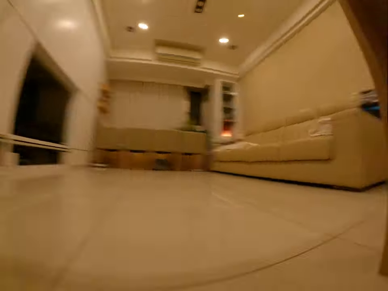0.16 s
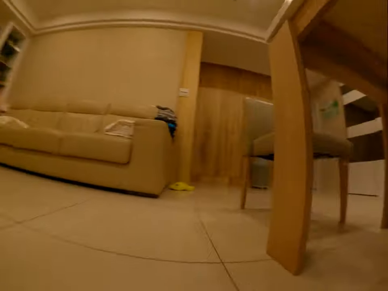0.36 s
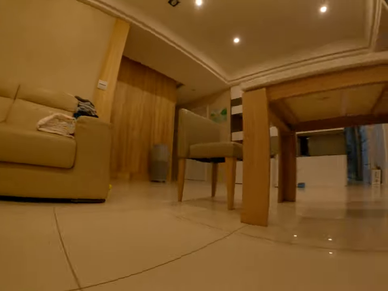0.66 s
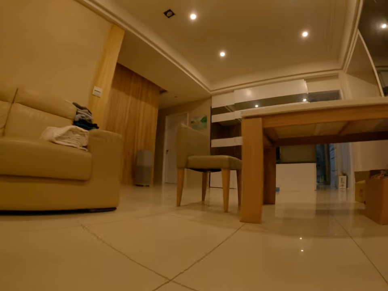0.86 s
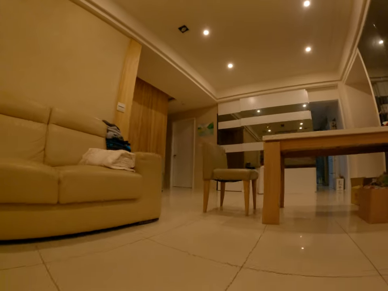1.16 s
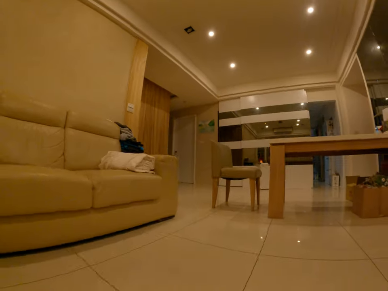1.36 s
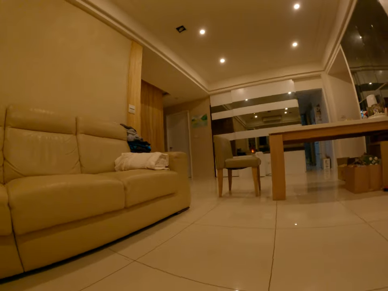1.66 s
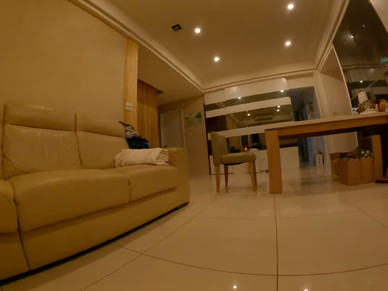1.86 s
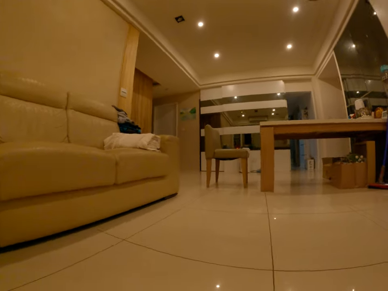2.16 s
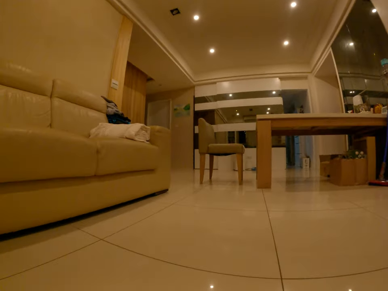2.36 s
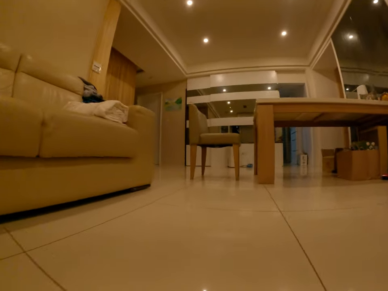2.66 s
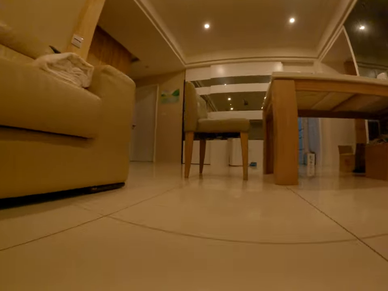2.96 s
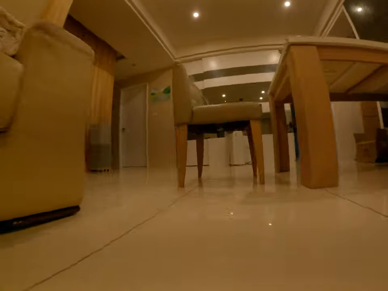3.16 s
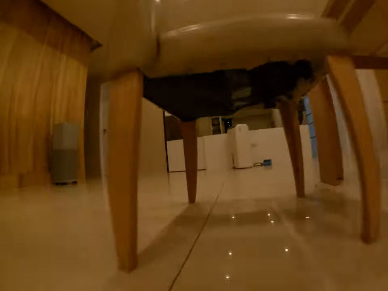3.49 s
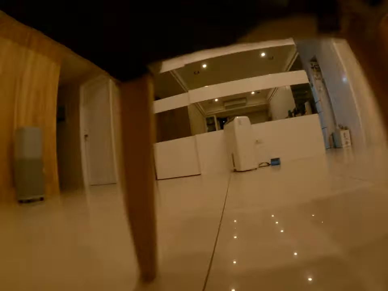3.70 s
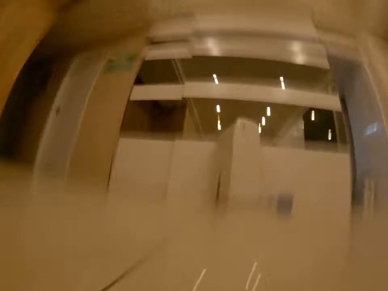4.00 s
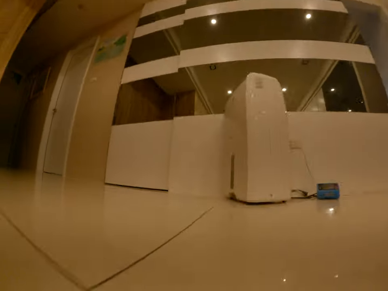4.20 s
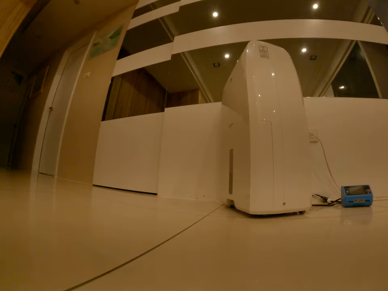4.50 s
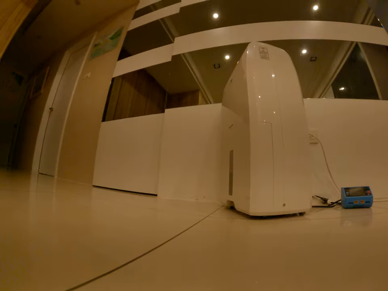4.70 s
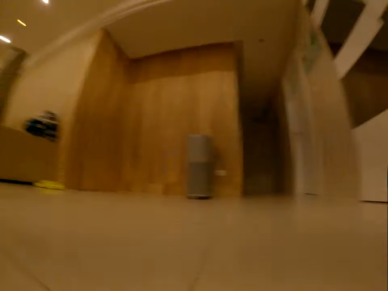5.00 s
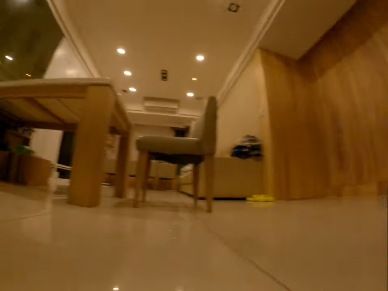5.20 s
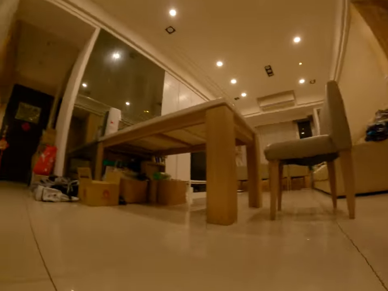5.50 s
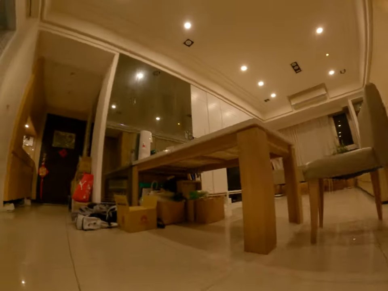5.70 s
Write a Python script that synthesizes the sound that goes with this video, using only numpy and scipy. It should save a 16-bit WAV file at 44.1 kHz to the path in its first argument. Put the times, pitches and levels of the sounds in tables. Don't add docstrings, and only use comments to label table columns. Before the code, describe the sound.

A small indoor drone whines and hisses, clatters down on tile, falls nearly silent, then its motors chirp and buzz back into flight.

```python
import sys
import numpy as np
from scipy import signal
from scipy.fft import rfft, irfft
from scipy.io import wavfile
from scipy.ndimage import uniform_filter1d

SR = 44100
rng = np.random.default_rng(int(sys.argv[2]) if len(sys.argv) > 2 else 0)


def wav_record(signal):
    frames = np.transpose(np.atleast_2d(signal))
    bounded = np.clip(frames, -1, 1)
    quanta = np.round(bounded * 32767).astype(np.int16)
    wavfile.write(sys.argv[1], SR, quanta)


def decibels_to_gain(level_db):
    exponent = np.asarray(level_db, float) / 20
    return 10 ** exponent


N = 257966
HOVER_HZ = 300
CHIP_HZ = 7600


def read(points, hz):
    f, value = np.transpose(points)
    return np.interp(np.log(hz + 1), np.log(f + 1), value)


def evened(x):
    return x / np.sqrt(np.mean(x ** 2) + 1e-20)


def play(rows, t):
    s, *columns = np.transpose(rows)
    return [np.interp(t, s, c) for c in columns]


def times(rows):
    return np.arange(rows[0][0], rows[-1][0], 1 / SR)


def add(mix, s, sound):
    part = mix[round(s * SR):][:len(sound)]
    part += sound[:len(part)]


def drift(size, hz):
    step = 32
    low_pass = signal.butter(2, hz, fs=SR / step, output="sos")
    coarse = signal.sosfilt(low_pass, rng.standard_normal(size // step + 500))
    count = size // step + 2
    return np.interp(np.arange(size) / step, np.arange(count), evened(coarse[-count:]))


def band(x, lo_hz, hi_hz):
    return signal.sosfilt(signal.butter(4, [lo_hz, hi_hz], "band", fs=SR, output="sos"), x)


def resonate(x, hz, width_hz):
    turn = np.exp(2j * np.pi * hz * np.arange(len(x)) / SR)
    r = np.exp(-np.pi * width_hz / SR)
    return 2 * (turn * signal.lfilter([1 - r], [1, -r], x / turn)).real


def air(tone, lo_hz, hi_hz, size, patchy_db, extra=None):
    hop = size // 4
    hz, t = np.fft.rfftfreq(size, 1 / SR), np.arange(N // hop + 5) * hop / SR
    a, b, patches = rng.standard_normal((len(t), len(hz), 3)).T
    patches = uniform_filter1d(patches, size=9, axis=0)
    patches = evened(uniform_filter1d(patches, size=9, axis=1))
    z = (a + 1j * b) * decibels_to_gain(read(tone, hz)[:, None] + patchy_db * patches)
    reference = band(signal.istft(z, nperseg=size)[1], lo_hz, hi_hz)
    scale = np.sqrt(np.mean(reference ** 2))
    if extra is not None:
        z = z * decibels_to_gain(extra(t, hz[:, None]))
    return signal.istft(z, nperseg=size, noverlap=size - hop)[1][:N] / scale * np.sqrt(2)


# hz, density_db
ROOM_TONE = [(20, -9), (60, 7), (160, 0), (370, -17), (600, -11), (2000, -28), (2670, -25), (4500, -39),
             (4900, -57), (9000, -72)]
# pitch_hz, level_db
WHINE = [(2159, -69), (2589, -67), (2649, -73), (2896, -76), (3079, -83), (4430, -80)]


def room():
    t = np.arange(N) / SR
    whine = 0
    for hz, db in WHINE:
        whine = whine + decibels_to_gain(db + 1.5 * drift(N, 7.8)) * np.sqrt(2) * np.sin(2 * np.pi * hz * t)
    return decibels_to_gain(-49.5) * air(ROOM_TONE, 174, 9000, size=1024, patchy_db=-2.5) + whine


# start_s, buffeting_db
WASH = [(0, -36), (.13, -24.5), (.7, -29.5), (.8, -23), (.96, -38), (1.1, -39), (1.25, -45), (1.55, -35),
        (1.75, -39), (2.0, -32.5), (2.31, -35), (2.51, -27), (3.03, -30), (3.12, -19.5), (3.3, -24.5),
        (3.5, -25), (3.65, -25.5), (3.8, -23), (4.05, -22), (4.32, -22.5), (4.52, -44.5), (4.65, -44.5),
        (4.76, -49), (4.9, -19.5), (5.08, -32), (5.26, -36), (5.41, -13.5), (5.54, -36), (5.85, -34)]
# hz, density_db
WASH_TONE = [(15, -12.5), (30, 1), (70, -5.5), (110, -3.5), (160, -10), (240, -11), (340, -20),
             (600, -49.5)]


def wash():
    def upper(t, hz):
        flying_db = 0.89 * (-29.5 - play(WASH, t)[0])
        upper_db = np.where(landed(t), -3, flying_db)
        return upper_db / (1 + (110 / (hz + 1)) ** 6)

    gusts = decibels_to_gain(play(WASH, np.arange(N) / SR)[0] + 1.9 * drift(N, 18.0))
    return gusts * air(WASH_TONE, 35, 83, size=2048, patchy_db=2.0, extra=upper)


# start_s, length_s, level_db, top_hz
PUFFS = [(.4, 0.13, -17, 234), (0.677, 0.093, -22, 203.6), (1.331, 0.19, -25, 186.5),
         (1.523, 0.11, -34, 80), (3.408, 0.061, -15.5, 259.4), (3.45, 0.08, -28, 89.86),
         (3.577, 0.08, -22, 79), (4.041, 0.064, -12, 144), (4.892, 0.07, -14.5, 291),
         (5.348, 0.092, -19.5, 222.2)]


def puffs():
    mix = np.zeros(N)
    for s, length_s, db, top_hz in PUFFS:
        lump = band(rng.standard_normal(SR // 2), top_hz / 3, top_hz)[-round(length_s * SR):]
        add(mix, s, decibels_to_gain(db) * evened(lump) * np.hanning(len(lump)))
    return mix


def thud(db):
    t = np.arange(3000) / SR
    blow = band(rng.standard_normal(len(t)) * decibels_to_gain(-60 * t / 0.071), 44, 650)
    return decibels_to_gain(db) * blow / abs(blow).max()


# start_s, peak_db, pitch_hz, brightness_db, thud_db
KNOCKS = [(4.017, -15, 3630, -8, -31), (4.0230, -17, 1750, -14, -12.5), (4.0456, -5, 1910, -6, -14),
          (4.0520, -5.5, 1640, -7.5, -20), (4.087, -20, 3000, -12, -30), (4.1815, -13.5, 3970, -7, -30),
          (4.1990, -12, 2460, -7, -15), (4.2060, -13, 1380, -19, -13.5), (4.255, -20, 1660, -14, -32),
          (4.2610, -17.5, 1540, -12, -34), (4.311, -27, 1250, -14, -40), (4.3230, -23, 1760, -12, -31),
          (4.3400, -25.5, 1440, -12, -44), (4.3600, -31, 1290, -8, -45), (4.578, -41, 2920, -36, -43),
          (4.79, -40, 1910, -23, -28.5)]


def knocks():
    mix, t = np.zeros(N), np.arange(3000) / SR
    decay = decibels_to_gain(-60 * t / 0.0085) + decibels_to_gain(-10 - 60 * t / 0.11)
    for s, peak_db, hz, bright_db, thud_db in KNOCKS:
        burst = rng.standard_normal(len(t)) * decay * np.minimum(t * 1500, 1)
        bright = band(burst, 4000, 15800) + 0.9 * resonate(burst, CHIP_HZ, 1460)
        bright = bright + 1.3 * band(burst, 10500, 15500)
        rattle = band(burst, 1170, 4900) + decibels_to_gain(bright_db + 3) * bright + 2.0 * resonate(burst, hz, 520)
        add(mix, s, decibels_to_gain(peak_db) * rattle / abs(rattle).max() + thud(thud_db))
    return mix


# start_s, peak_db
BUMPS = [(3.432, -14), (3.951, -9), (3.997, -13.5), (4.069, -16), (4.226, -21), (4.243, -26), (4.266, -27),
         (4.28, -29), (4.295, -28), (5.385, -14)]


def bumps():
    mix = np.zeros(N)
    for s, peak_db in BUMPS:
        add(mix, s - .004, thud(peak_db))
    return mix


# start_s, level_db
SKID = [(3.979, -60), (4.04, -30), (4.075, -32), (4.1, -30), (4.16, -44), (4.178, -37), (4.19, -44),
        (4.22, -39), (4.25, -50), (4.33, -50), (4.4, -55), (4.5, -62), (4.6, -72)]


def skid():
    mix, t = np.zeros(N), times(SKID)
    grit = rng.standard_normal(len(t)) * decibels_to_gain(4.8 * drift(len(t), 120))
    scrape = band(grit, 3000, 15000) + 1.3 * resonate(grit, CHIP_HZ, 1500)
    scrape = scrape + 5.5 * band(grit, 10500, 15500)
    add(mix, t[0], decibels_to_gain(play(SKID, t)[0]) * evened(scrape))
    return mix


# start_s, pitch_hz, level_db
ROCKING = [(4.201, 74.5, -50), (4.23, 76.7, -18), (4.3, 63.1, -20.5), (4.4, 61.8, -25.5),
           (4.49, 46.1, -25.5), (4.52, 48, -51)]


def rocking():
    mix, t = np.zeros(N), times(ROCKING)
    hz, db = play(ROCKING, t)
    swing = 2 * np.pi * np.cumsum(hz * (1 + 0.13 * drift(len(t), 29))) / SR
    add(mix, t[0], decibels_to_gain(db) * (np.sin(swing) + 0.46 * np.cos(2 * swing)))
    return mix


# start_s, buzz_db
SPIN_UP = [(4.785, -62), (4.792, -39), (4.81, -45), (4.822, -54), (4.827, -33), (4.836, -40), (4.84, -28),
           (4.86, -39), (4.885, -25)]
# pitch_hz, width_hz, level_db
COILS = [(1470, 330, 1), (1926, 110, -1), (2700, 1000, -3), (7500, 1200, -12.5)]


def coil_buzz():
    mix, t = np.zeros(N), times(SPIN_UP)
    drive, buzz = rng.standard_normal(len(t)), 0
    for hz, width_hz, db in COILS:
        mode = resonate(resonate(drive, hz, width_hz), hz, width_hz)
        buzz = buzz + decibels_to_gain(db) * evened(mode)
    add(mix, t[0], decibels_to_gain(play(SPIN_UP, t)[0]) * evened(buzz) * signal.windows.tukey(len(t), .15))
    return mix


# start_s, pitch_hz, level_db
CATCH = [
    [(4.787, 1850, -60), (4.793, 1902, -35), (4.817, 1860, -55), (4.826, 1890, -41), (4.837, 1885, -31),
     (4.849, 1880, -33), (4.857, 1980, -31), (4.865, 2190, -20), (4.875, 2181, -36)],
    [(4.86, 1050, -45), (4.872, 1150, -33), (4.885, 1190, -13), (4.895, 1300, -24)],
]


def coil_song():
    mix = np.zeros(N)
    for rows in CATCH:
        t = times(rows)
        hz, db = play(rows, t)
        song = np.sqrt(2) * np.sin(2 * np.pi * np.cumsum(hz * (1 + .015 * drift(len(t), 150))) / SR)
        add(mix, t[0], decibels_to_gain(db) * song * signal.windows.tukey(len(t), .1))
    return mix


# start_s, turbulence (0-1)
CHURN = [(0, .3), (.12, .5), (.22, .2), (.3, .5), (.45, .6), (.6, 0), (2.7, 0), (2.9, 1), (3.3, .9),
         (3.45, .7), (3.8, .75), (3.95, .9), (4.86, 1.2), (4.91, .6), (4.98, .5), (5.05, .1), (5.3, .1),
         (5.37, 1), (5.5, 1), (5.62, .6), (5.85, .45)]


def churning(t):
    return play(CHURN, t)[0]


# start_s, lean (0-1)
LEAN = [(0, 0.85), (.13, 0.85), (.22, 1), (.31, 0.9), (.4, 0.22), (.6, 0.01), (1.95, 0.27), (2.2, 0.56),
        (2.45, 0.02), (2.6, 0.04), (2.8, 1), (3.95, 0.92), (4.86, 1.1), (4.89, 1), (4.915, 0.5),
        (4.95, 0.45), (4.99, .95), (5.04, .95), (5.08, .75), (5.17, .8), (5.23, 0.5), (5.36, 0.85),
        (5.42, .5), (5.5, 1), (5.56, .9), (5.62, 0.1)]


def leaning(t):
    return play(LEAN, t)[0]


# centre_s, half_length_s, depth (0-1)
WAKES = [(.47, .08, .9), (3.05, .27, .7), (5.04, .18, 1), (5.41, .05, .9)]


def wake(t):
    return sum(depth * np.exp(-((t - s) / half) ** 4) for s, half, depth in WAKES)


# peak_s, extra_shaft_hz, rise_s, fall_s, flatness (1 pointed - 3 flat)
STABS = [(.22, 132, .03, .036, 2.3), (4.912, 340, .025, .06, 1.6), (5.384, 95, .009, .013, 1.4)]


def stabs(t):
    extra_hz = 0
    for s, hz, rise_s, fall_s, flatness in STABS:
        away = abs((t - s) / np.where(t < s, rise_s, fall_s))
        extra_hz = extra_hz + hz * np.exp(-away ** flatness)
    return extra_hz


def landed(t):
    return (t > NEAR[0][-1][0]) & (t < NEAR[1][0][0])


# hz, density_db
HISS_TONE = [(150, -47), (300, -2.5), (480, -8), (1000, -3.5), (1700, -1), (2200, -2.5), (3300, 0),
             (4400, -5.5), (5000, -10), (8000, -12.5), (16000, 0)]
# start_s, notch_hz, depth_db
TILE = [(5.0, 2100, 0), (5.1, 2200, 3), (5.22, 2400, 11), (5.28, 3300, 12), (5.32, 5200, 12),
        (5.35, 8000, 10), (5.38, 11000, 0)]


def hiss():
    cut_s, lift_s = NEAR[0][-1][0], NEAR[1][0][0]
    power_law, far_share = 1.35, 0.84
    tip_hz = 11800
    bite_s = 0.042

    def colour(t, hz):
        notch_hz, depth_db = play(TILE, t)
        away = np.log(hz / notch_hz + 1e-9) / 0.12
        echo = depth_db * (0.3 * np.exp(-(away - 2.2) ** 2 / 2) - np.exp(-away ** 2))

        nearest_s = np.where(t < (cut_s + 3 * lift_s) / 4, cut_s, lift_s)
        held = np.where(landed(t), nearest_s, t)
        near_hz = play(list(NEAR[0]) + list(NEAR[1]), held)[0] + stabs(held)
        far_hz = play(list(FAR[0]) + list(FAR[1]), held)[0]
        restart_hz = np.minimum(far_hz, play(FAR[1], held)[0])
        far_hz = np.where(held < lift_s, far_hz, restart_hz)

        power = (1 - far_share) * (near_hz / HOVER_HZ) ** power_law
        power = power + far_share * (far_hz / HOVER_HZ) ** power_law
        bite_db = 4.5 * np.exp(-((held - lift_s - bite_s / 2) / bite_s) ** 2)
        coast_db_per_s = np.where(held < t, 59, 480)
        level = (10 * np.log10(power) + bite_db) * (1 + hz / tip_hz)
        level = level - coast_db_per_s * abs(t - held) * (1 + hz / 40000)

        heap_db = (3.5 + 3.5 * leaning(t) - 4 * wake(t) * (hz > 2400)) * ~landed(t)
        heaps = heap_db * np.cos(2 * np.pi * hz / (3 * near_hz * .97)) / (1 + (hz / 4500) ** 4)
        climb = np.exp(-(np.maximum(t - lift_s, 0) / 0.74) ** 2)
        low = 7 * (t > cut_s) * climb / (1 + (hz / 1400) ** 2)
        churned = 2.5 * wake(t) * np.exp(-np.log(hz / 3300 + 1e-9) ** 2 / 0.057)
        cut_db = -2.5 * landed(t) * (held < t)
        return level + cut_db + low + heaps + echo + churned

    flicker = decibels_to_gain(-30.5 + 0.66 * drift(N, 250))
    return flicker * air(HISS_TONE, 5220, 8070, size=512, patchy_db=1.5, extra=colour)


def blade_tone(law, hz, t):
    hover_db, octave_db, lean_db, wake_db = law
    return hover_db + octave_db * np.log2(hz / HOVER_HZ) + lean_db * leaning(t) + wake_db * wake(t)


# start_s, shaft_hz, shake_db, blade_load_db
FAR = [
    [(0, 278.3, -33, 3), (.14, 291.2, -32, 3), (.18, 329, -34, -4), (.222, 446.5, -29, -16),
     (.27, 419.9, -39, -18), (.33, 370.6, -43, -9), (.37, 329, -49, -5), (.4, 254, -53, 12.5),
     (.7, 289.6, -34, -18), (1.4, 270.1, -32, 3.5), (2.4, 281.1, -34, -1), (3.0, 285.6, -30.5, 3),
     (3.4, 281.2, -32.5, 0), (3.55, 278.4, -29, -4), (3.8, 270.5, -33, -0.5), (3.95, 228, -27, -9)],
    [(4.93, 133.8, -16.5, -3), (5.0, 150.5, -25, -2), (5.04, 170.9, -28, -2), (5.08, 200.2, -21, 13),
     (5.15, 261.5, -28, 6), (5.25, 253.8, -31, 2), (5.4, 287.4, -40, 4.5), (5.6, 285.8, -47, -3),
     (5.85, 283, -32, -3)],
]
# hover_db, db_per_speed_octave, full_lean_db, wake_db
FAR_LAW = (-37, 29, 7, -1.5)


def far_rotor(flight, offset, wobble, shake_db):
    t = times(FAR[flight])
    hz, shaft_db, load_db = play(FAR[flight], t)
    blade_db = load_db + blade_tone(FAR_LAW, np.minimum(hz, 306), t)
    wander = offset + 0.01185 * drift(len(t), 5.12) + wobble * drift(len(t), 57.3)
    turns = np.cumsum(hz * wander) / SR
    blades = 0
    for order, db in [(3, 2.5), (6, 2), (9, 1.5), (12, -26), (15, -19)]:
        blades = blades + decibels_to_gain(db + 3.4 * drift(len(t), 19.4)) * np.cos(2 * np.pi * order * turns)
    sound = decibels_to_gain(shaft_db + shake_db) * np.cos(2 * np.pi * turns) + decibels_to_gain(blade_db) * blades
    return t[0], sound * signal.windows.tukey(len(t), 0.036 / (t[-1] - t[0]))


def rotor(rows, orders, leads, laws, stabbed, wobble, flutter_db, between_db):
    t = times(rows)
    hz, load_db, *lead_db = play(rows, t)
    hz = uniform_filter1d(hz + stabbed * stabs(t), size=400)
    lead_db += [load_db + blade_tone(law, hz, t) for law in laws]
    lead_gain = [decibels_to_gain(db) for db in lead_db]
    churn = churning(t)
    tremble = wobble * (0.816 + 1.0 * churn) * drift(len(t), 34.0)
    spin = np.exp(2j * np.pi * np.cumsum(hz * (1 + tremble)) / SR)
    imbalance = (1 - .6 * wake(t) ** 3) / (1 + stabs(t) / 60)
    imbalance = imbalance * (1 - .25 * leaning(t))
    flutter = [decibels_to_gain(flutter_db * (1 + 0.25 * churn) * drift(len(t), 15.4)) for _ in range(5)]
    shape = {round(k): db for k, db in orders}
    sound, tone = 0, 1
    for k in range(1, max(shape) + 1):
        tone = tone * spin
        if k not in shape:
            continue
        group = int(np.argmin(abs(np.array(leads) - k)))
        off_blade = k % 3 > 0
        weak_db = between_db * (off_blade and k > 1)
        gain = decibels_to_gain(shape[k] - shape[leads[group]] + weak_db)
        start = gain * np.exp(2j * np.pi * rng.random())
        shelf = .4 + .6 / (1 + (k * hz / 4800) ** 8)
        shelf = shelf * (1 - .7 * churn * (k > 9))
        if off_blade and k > 3:
            shelf = shelf * imbalance
        sound = sound + shelf * lead_gain[group] * flutter[k % 5] * (start * tone).real
    return t[0], np.sqrt(2) * sound * signal.windows.tukey(len(t), 0.0037 / (t[-1] - t[0]))


# start_s, shaft_hz, blade_load_db
NEXT = [
    [(.34, 264.2, -7), (.38, 315, 10), (.41, 345.3, 6), (.47, 346.8, 10.5), (.58, 337.3, 8),
     (.75, 325.5, 5), (.81, 346, 6.5), (.9, 341, 11), (1.0, 331.5, 8.5), (1.13, 327, 7), (1.25, 297.4, 10),
     (1.3, 292.9, 4), (1.45, 289.7, 7.5), (1.63, 304.9, 6), (1.8, 301.5, 3), (2.1, 308.3, 7.5),
     (2.8, 303.3, -5), (3.15, 300.3, 0.5), (3.25, 285.8, -1), (3.4, 283.7, -7), (3.56, 285.3, -1.5),
     (3.66, 287.5, -3), (3.73, 293, -2), (3.85, 280, -4), (3.94, 246, 3.5)],
    [(5.45, 310, 6), (5.54, 284.5, -9), (5.64, 296.4, -2), (5.71, 317, 5.5), (5.76, 323.8, 3.5),
     (5.82, 321, 2), (5.85, 309.7, 3)],
]
# shaft_order, level_db
NEXT_DB = [(1, -16), (3, 0), (5, -14), (6, 0), (9, -15), (12, -7), (15, -17)]
# hover_db, db_per_speed_octave, full_lean_db, wake_db
NEXT_LAW = [(-43.5, 4.5, 20, 0.59), (-33.5, 2.8, 0.5, 1.6), (-47, 3, 22, -6), (-40.5, 2.8, 0.5, 1.6)]


def neighbour_rotor(flight):
    return rotor(NEXT[flight], NEXT_DB, (3, 6, 9, 12), NEXT_LAW, False,
                 wobble=.007, flutter_db=1.8, between_db=-1.5)


# start_s, cruising_shaft_hz, blade_load_db, shake_db
NEAR_OUT = [(0, 307.6, 3, -33), (.13, 306, -2, -33.5), (.18, 324.5, 0, -31), (.2, 327, -6.5, -27),
            (.225, 327, -3.5, -30), (.25, 332, -12.5, -21.5), (.27, 332, -9, -23.5),
            (.295, 333, -0.5, -25.5), (.335, 314.4, -3, -31), (.355, 297, 1, -25), (.378, 264, 3, -21.5),
            (.44, 240.7, -14, -24.5), (.5, 262.7, -3, -21), (.54, 284.2, 1.5, -24), (.58, 293.5, 2, -34),
            (.67, 301.3, 1.5, -27.5), (.75, 282, 2.5, -31), (.83, 290.5, -1.5, -30),
            (.97, 290.7, -0.5, -26), (1.13, 302.2, 2, -25), (1.25, 282.9, 0.5, -28.5),
            (1.39, 275, 2.5, -22), (1.53, 282.5, 1.5, -33), (1.7, 293.8, 2, -30.5), (2.0, 296.4, 1, -28.5),
            (2.15, 305.8, 1, -27), (2.43, 312.7, 2, -23.5), (2.9, 317, -0.5, -25), (3.15, 311.9, -2, -29),
            (3.5, 296.7, 3, -30), (3.66, 307.5, -1, -24.5), (3.85, 290.6, 4.5, -38), (3.94, 247.4, -6, -20)]
# start_s, cruising_shaft_hz, blade_load_db, shake_db
NEAR_BACK = [(4.872, 184.2, -3, -34), (4.885, 190, 0, -33), (4.9, 196, -3, -33), (4.925, 208, 0, -38),
             (4.95, 219.7, 1, -36), (4.975, 229, 1, -40), (5.0, 238, 1, -37), (5.035, 235, 1, -32),
             (5.08, 264, 1, -35), (5.12, 276, 0, -30), (5.165, 260, -1, -28), (5.21, 248, 4, -24.5),
             (5.28, 264.7, 5, -26), (5.36, 257.5, 0, -19), (5.385, 290.2, -4, -30), (5.4, 312.2, -3, -34),
             (5.44, 309.8, -2, -38), (5.5, 302.7, -7, -26), (5.52, 294, -6, -25.5), (5.6, 288, 3, -31),
             (5.71, 307, -1, -28), (5.79, 306, -0.5, -29.5), (5.85, 302, -1, -28)]
NEAR = [NEAR_OUT, NEAR_BACK]
# shaft_order, level_db
ORDER_DB = [(1, 0), (2, -11), (3, -1), (4, -14), (5, -6), (6, -2), (7, -15), (8, -10), (9, 0), (11, -12),
            (12, -4), (15, -9), (18, -13), (21, -12), (24, -10)]
# hover_db, db_per_speed_octave, full_lean_db, wake_db
NEAR_LAW = [(-35, 16, 9, 2), (-27.5, 6, -9, 4), (-27.5, 10, 0, -13)]


def near_rotor(flight):
    return rotor(NEAR[flight], ORDER_DB, (1, 3, 6, 9), NEAR_LAW, True,
                 wobble=0.00517, flutter_db=1.8, between_db=0.5)


def rotors():
    mix = np.zeros(N)
    for flight in range(2):
        add(mix, *near_rotor(flight))
        add(mix, *neighbour_rotor(flight))
        add(mix, *far_rotor(flight, offset=1.025, wobble=0.01397, shake_db=3.5))
        add(mix, *far_rotor(flight, offset=0.92, wobble=0.0181, shake_db=-1.5))
    return decibels_to_gain(1.0) * mix


# hz, side_against_mid_db
SIDE_TONE = [(60, -36), (150, -30), (330, -27), (770, -31), (1800, -33), (3000, -30), (5000, -21), (9000, -17),
             (10500, -22)]
# start_s, end_s
APART = [(.58, .86), (1.65, 2.35), (2.9, 3.27), (3.33, 4.0), (4.04, 4.1), (4.17, 4.25), (4.33, 4.42),
         (4.82, 4.85), (5.27, 5.38)]
# start_s, end_s
TOP_ALIKE = [(.62, 1.157), (3.45, 4.04)]


def scene():
    mid = rotors() + hiss() + wash()
    mid = mid + knocks() + bumps() + skid() + rocking()
    mid = mid + coil_buzz() + coil_song() + room() + puffs()
    hz, t, z = signal.stft(mid, SR, nperseg=1024)
    apart = sum((a < t) & (t < b) for a, b in APART)
    alike = uniform_filter1d(sum(1. * (a < t) * (t < b) for a, b in TOP_ALIKE), size=15)
    top = np.exp(-((hz[:, None] - 12700) / 1000) ** 4) * decibels_to_gain(-0.5 - 14 * alike)
    share = decibels_to_gain(read(SIDE_TONE, hz) + 2.5)[:, None] * (hz[:, None] < 11000) * (.05 + apart) + top
    phase = np.exp(2j * np.pi * rng.random(z.T.shape).T)
    side = signal.istft(z * share * phase, SR, nperseg=1024)[1][:N]
    return np.array([mid + side, mid - side])


# hz, level_db
MIC = [(8000, 0), (8600, -4.5), (10200, -20), (12200, -30), (14000, -42), (15600, -51)]


def roll_off(x):
    return signal.sosfilt(signal.butter(12, 15610, fs=SR, output="sos"), x)


def record(dry):
    response = decibels_to_gain(read(MIC, np.fft.rfftfreq(N, 1 / SR)))
    overloaded = 0.77 * np.tanh(dry / 1.002)
    return roll_off(irfft(rfft(overloaded) * response, N))


dry = scene()
out = record(dry)
wav_record(out)
```